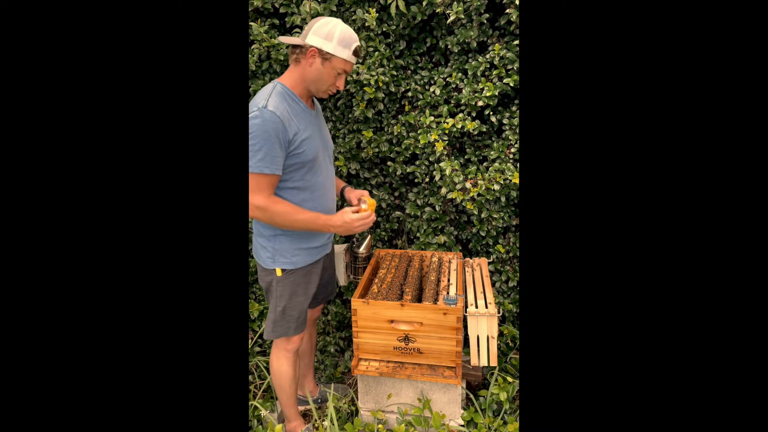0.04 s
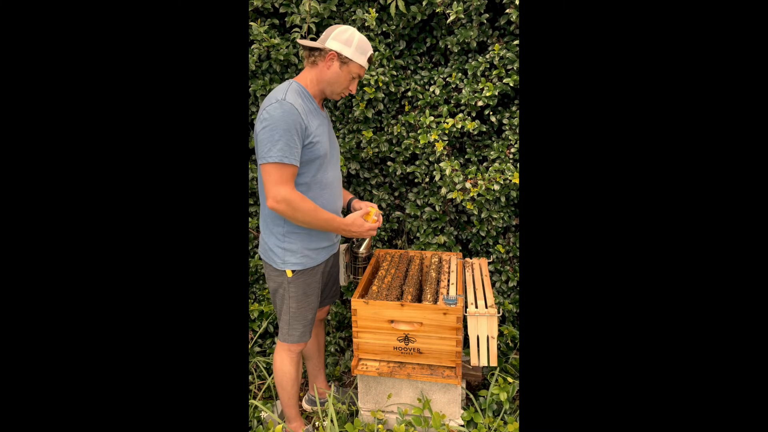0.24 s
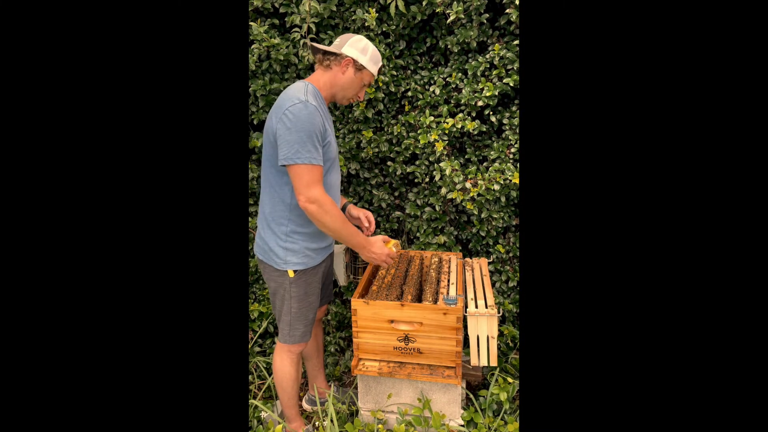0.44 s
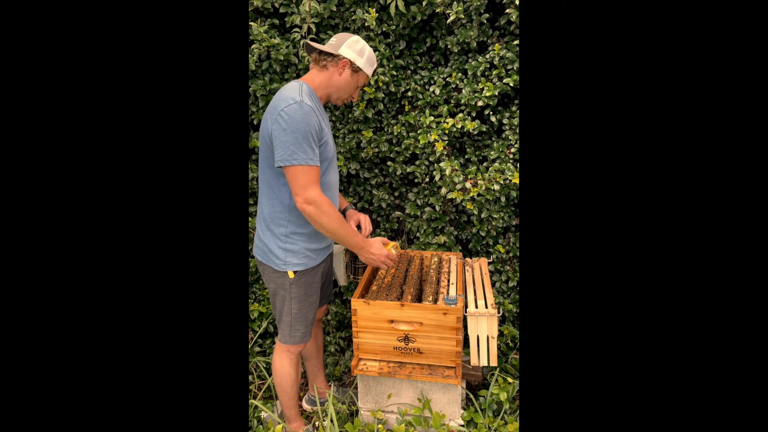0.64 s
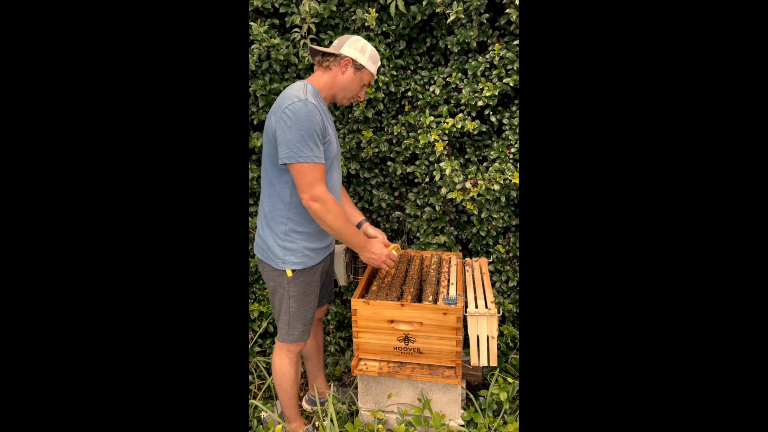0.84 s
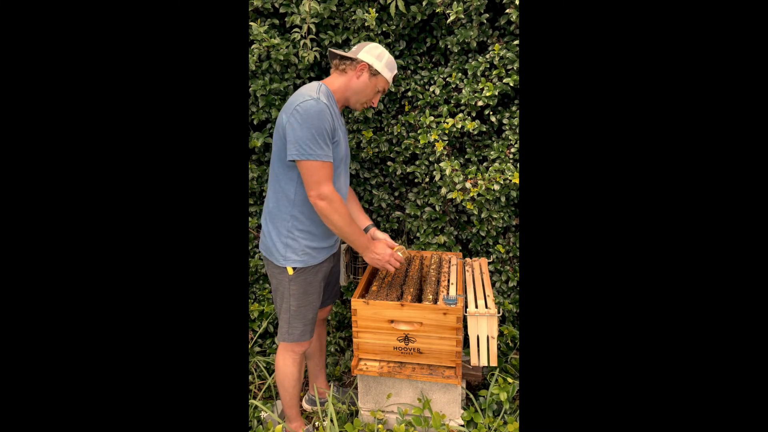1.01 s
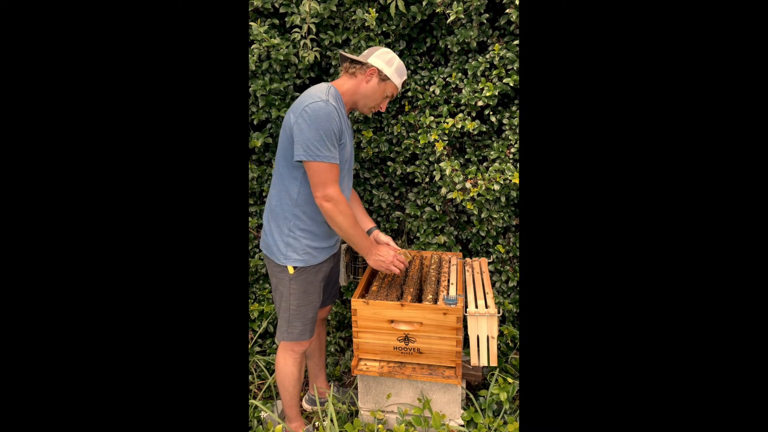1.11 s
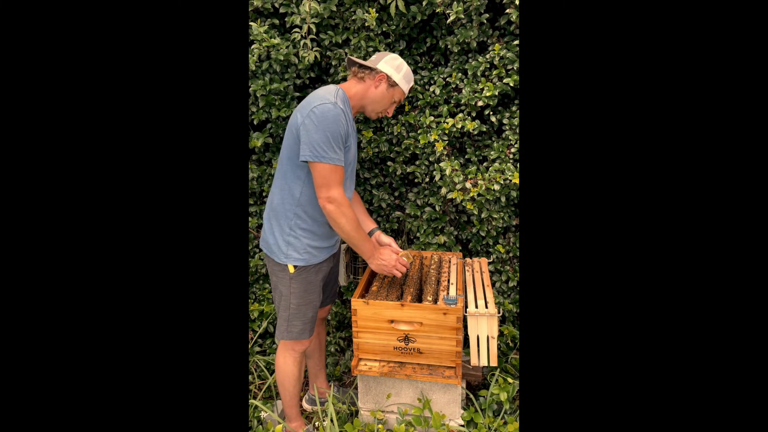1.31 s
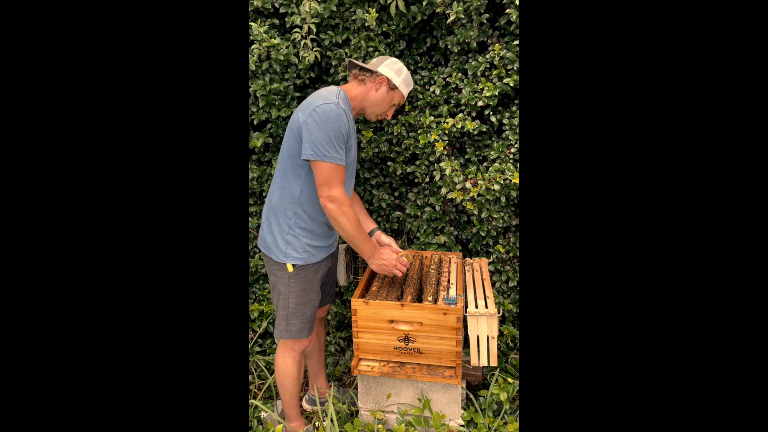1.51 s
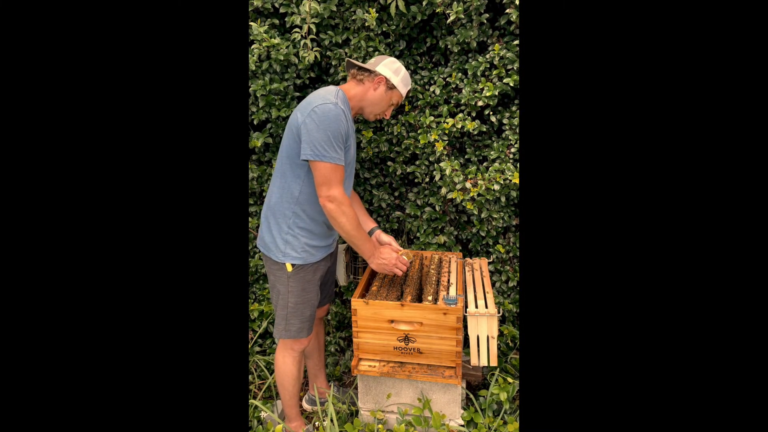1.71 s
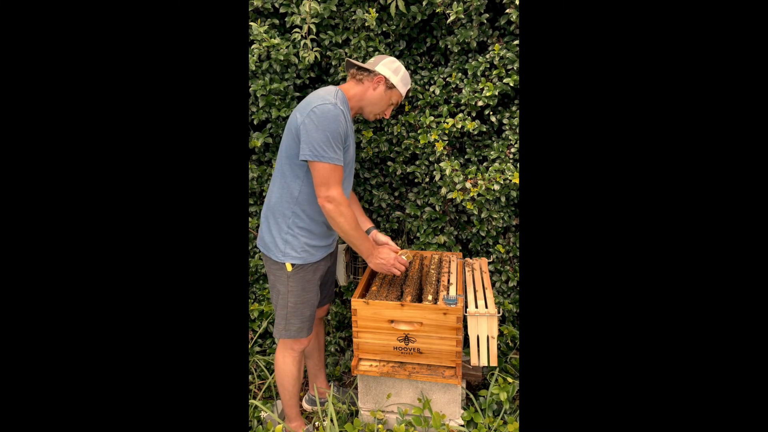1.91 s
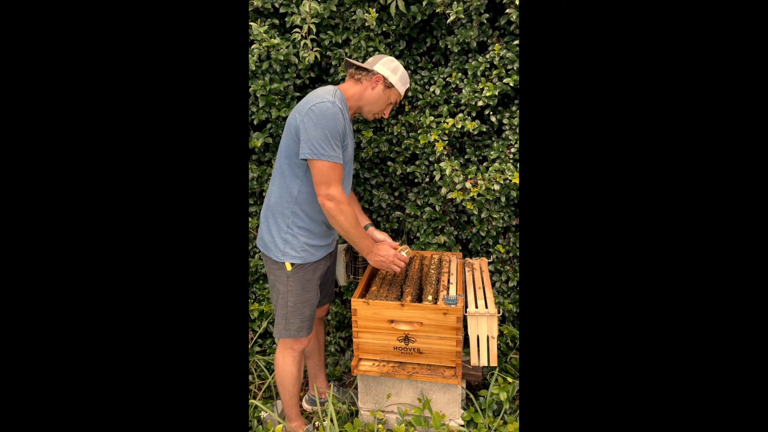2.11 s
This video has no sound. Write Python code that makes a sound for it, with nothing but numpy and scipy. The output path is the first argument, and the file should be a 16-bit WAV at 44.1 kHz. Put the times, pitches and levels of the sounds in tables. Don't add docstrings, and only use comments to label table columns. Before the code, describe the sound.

Honeybees buzz around an open wooden hive outdoors, with soft dull knocks on the wood

```python
import sys
import numpy as np
from scipy import signal
from scipy.fft import rfft, irfft
from scipy.io import wavfile
from scipy.ndimage import uniform_filter1d

SR = 44100
rng = np.random.default_rng(int(sys.argv[2]) if len(sys.argv) > 2 else 0)


def amplitude_ratio(level_db):
    exponent = np.asarray(level_db, float) / 20
    return 10 ** exponent


def materialize(psi):
    bounded = np.clip(np.atleast_2d(psi).T, -1, 1)
    quanta = np.round(bounded * 32767).astype(np.int16)
    wavfile.write(sys.argv[1], SR, quanta)


N = 94815
T = np.arange(N) / SR
HZ = np.maximum(np.arange(N // 2 + 1) * SR / N, 1)
GATE_S = 0.17
OPPOSITE = np.array([[1], [-1]])


def unit(x):
    return x / np.sqrt(np.mean(x ** 2))


def noise():
    return rng.standard_normal(N)


def curve(rows, axis=1):
    rows = np.array(rows)
    return np.interp(T, rows[:, 0], rows[:, axis])


def along(points):
    p = np.array(points)
    return np.interp(np.log(HZ), np.log(p[:, 0]), p[:, 1])


def gain_db(x, points):
    octaves_below = np.maximum(np.log2(points[0][0] / HZ), 0)
    octaves_above = np.maximum(np.log2(HZ / points[-1][0]), 0)
    return irfft(rfft(x) * amplitude_ratio(along(points) - 90 * (octaves_below + octaves_above)), N)


def walk(rate):
    k = int(SR / rate)
    held = np.repeat(rng.standard_normal(N // k + 1), k)
    return 1.463 * uniform_filter1d(uniform_filter1d(held, k), k)[:N]


def flicker(x, points, own_db, rate, lowest=21, count=12):
    spectrum = rfft(gain_db(x, points))
    total = 0
    for centre in lowest + np.arange(count):
        band = np.clip(1 - abs(3 * np.log2(HZ) - centre), 0, 1)
        total = total + amplitude_ratio(own_db * walk(rate)) * irfft(spectrum * band, N)
    return unit(total)


def wings(hz, orders, waver_db):
    phase = 2 * np.pi * np.cumsum(hz) / SR
    total = 0
    for k, db in orders:
        total = total + amplitude_ratio(db + waver_db * walk(13.7)) * np.sin(k * phase + 6 * rng.random())
    return np.sqrt(2) * total


def rings(modes, start, rise):
    t = np.maximum(T - start, 0)
    ringing = sum(amplitude_ratio(db - 60 * t / t60) * np.sin(2 * np.pi * hz * t) for hz, db, t60 in modes)
    return (1 - np.exp(-(t / rise) ** 2)) * ringing


# low end, top end, top-end port difference
# freq_hz, level_db (per Hz)
LEAK_LOW = [(45, -11), (80, 4), (150, -0.5), (220, -20), (380, -37), (590, 0.5), (900, -15.5), (1500, -29)]
LEAK_TOP = [(1800, 3.5), (3700, -4), (5600, 1), (7900, 1), (8600, -61), (9900, -7), (10900, 9.5),
            (11700, -36)]
LEAK_SIDE = [(1800, -14), (3700, -7), (5100, 3), (6000, -22), (7200, -2), (9200, 3), (10900, 5),
             (11700, -28)]


def gate_leak():
    low_db, sag_db_per_s, top_db, side_db = -65.5, -55, -79, -78.5
    mid, apart = unit(gain_db(rng.standard_normal((2, N)), LEAK_LOW)) * amplitude_ratio(2.0 * walk(25))
    low = mid + gain_db(apart, [(250, 15), (600, -0.5), (1600, -6)]) * OPPOSITE
    top = unit(gain_db(noise(), LEAK_TOP)) * amplitude_ratio(top_db)
    top = top + unit(gain_db(noise(), LEAK_SIDE)) * amplitude_ratio(side_db) * OPPOSITE
    top = top * amplitude_ratio(1.9 * walk(26.3))
    return (low * amplitude_ratio(low_db + sag_db_per_s * T) + top) * amplitude_ratio(-600 * np.maximum(T - GATE_S, 0))


def dying_thrum():
    return unit(gain_db(noise(), [(230, -1), (700, -4.0)])) * amplitude_ratio(-63 - 200 * T)


def rumble():
    ports = np.array([[1, 0.25], [1, -0.22]]) @ rng.standard_normal((2, N))
    return unit(gain_db(ports, [(35, 0), (60, -17.0), (85, -3)])) * amplitude_ratio(-87 - 5.5 * T)


def far_murmur():
    level_db, full_s, rise_s = -78, 0.52, 0.22
    rise_db = level_db - 12 * np.clip((full_s - T) / rise_s, 0, 1) - 1.74 * T
    return unit(gain_db(noise(), [(850, 8.5), (1400, -2.5)])) * amplitude_ratio(1.9 * walk(14.8)) * amplitude_ratio(rise_db)


# start_s, level_db, ring_set (index)
TICKS = [
    (.0700, -46, 0),
    (.1333, -41, 1),
]
# freq_hz, level_db, t60_s
TICK_RINGS = [
    [(7540, 0, 0.012), (10400, -3, 0.0087), (3480, -7, 0.0067), (9000, -12, .01)],
    [(10580, 1.5, 0.011), (5530, 1, 0.0065), (3850, -3, 0.0054), (11900, -12, 0.013), (7460, -5, 0.0053)],
]


def ticks():
    tail_db, tail_t60_s = -16, 0.045
    right_lag_s = 2.8e-5
    out = 0
    for s, db, k in TICKS:
        modes = TICK_RINGS[int(k)]
        tail = [(hz, d + tail_db, tail_t60_s) for hz, d, _ in modes]
        grit = uniform_filter1d(uniform_filter1d(rng.standard_normal((2, N)), size=40), size=30) * 7
        hit = rings(modes, s + np.array([[0], [right_lag_s]]), .0011)
        out = out + amplitude_ratio(db + 1.0 * OPPOSITE) * (hit + grit * rings(tail, s, .004))
    return gain_db(out, [(2000, 0), (12600, 0)])


def flecked(x):
    fleck_db = 2.9
    z = signal.stft(x, nperseg=512)[2]
    patch = uniform_filter1d(rng.standard_normal(z.shape[1:]), size=2, axis=0)
    patch = uniform_filter1d(patch, size=3, axis=1)
    return unit(signal.istft(z * amplitude_ratio(fleck_db * unit(patch)), nperseg=512)[1][:, :N])


# freq_hz, level_db
PORT_SIDE = [(1250, -9), (1800, -8), (2700, -1), (4500, -1.5), (5600, -6), (6600, -12.5), (8300, -8),
             (9400, -1.5)]
# freq_hz, share (0 to 1, negative leans right)
PORT_LEAN = [(2000, 0.0079), (2450, 0.57), (4800, 0.6), (6200, 0.43), (11000, -0.17), (12200, -0.055),
             (13500, 0.36), (15200, -0.13)]


def wide(points, own_db, lowest, count):
    both, other = rng.standard_normal((2, N)) * amplitude_ratio(.5 * walk(60))
    lean = np.clip(along(PORT_LEAN), -1, 1)
    mixed = lean * rfft(both) + np.sqrt(1 - lean ** 2) * rfft(other)
    side = irfft(amplitude_ratio(along(PORT_SIDE)) * mixed, N)
    return flecked(flicker(np.array([both + side, both - side]), points, own_db, 20, lowest, count))


# start_s, level_db
RUSTLE = [(0.17, -84), (0.192, -86), (0.214, -63), (0.23, -58), (0.262, -60), (0.616, -58.5), (0.88, -61),
          (1.294, -60.5), (1.3, -62.5), (1.476, -61), (1.51, -57), (1.63, -62), (1.658, -59),
          (1.692, -63.5), (1.978, -67), (1.994, -68), (2.104, -67), (2.15, -69)]
# freq_hz, level_db (per Hz)
RUSTLE_COLOUR = [(1300, -18.5), (1900, -4), (2350, -3.5), (2600, -11), (3900, 1), (4450, -5.5), (5200, -4),
                 (6200, -15)]
# order (multiple of its pitch), level_db
WHINE_ORDERS = [(9, -6.5), (10, -2.5), (12, -30), (13, -16.5), (14, -18.5), (15, -1), (16, -2), (17, -25),
                (18, -3), (21, -15), (30, -20)]


def rustle():
    whine_hz, whine_db = 235.05, -17.5
    lone_hz, lone_db = 2396.5, -7
    whine = wings(np.full(N, whine_hz), WHINE_ORDERS + [(lone_hz / whine_hz, lone_db)], 2.0)
    mids = wide(RUSTLE_COLOUR, own_db=1.1, lowest=29, count=11) + whine * amplitude_ratio(whine_db + 3.0 * OPPOSITE)
    rush_db = 0.26 * np.exp(-np.maximum(T - .22, 0) / 0.037)
    return amplitude_ratio(curve(RUSTLE) + 2.0 + rush_db) * mids


# start_s, level_db
AIR = [(0.17, -86), (0.196, -107), (0.224, -74), (0.434, -70), (0.444, -72.5), (0.572, -68), (0.748, -75.5),
       (1.366, -75.5), (1.398, -70.5), (1.444, -76), (1.488, -71), (1.696, -74.5), (1.752, -79),
       (2.15, -83.5)]
# freq_hz, level_db (per Hz)
AIR_COLOUR = [(6200, 0.5), (6850, 6.5), (7700, 0.5), (9900, -5.5), (10800, -4.5), (12500, -7.5),
              (15000, -3.5), (15600, -6)]


def air():
    gate_db = -25 * (T < GATE_S + .01)
    return amplitude_ratio(curve(AIR) + 2.0 + gate_db) * wide(AIR_COLOUR, own_db=1.3, lowest=37, count=6)


# order (multiple of wing beat), level_db
PASS_ORDERS = [(1, 3.5), (1.5, -0.5), (2, -3), (2.5, -7), (3, -22)]


def passes():
    bees, length_s = 110, .18
    pitch_hz, spread_hz, glide = 264.4, 45, 0.099
    out, n = np.zeros(N), int(length_s * SR)
    u = np.arange(n) / n
    for j, (at, pitch, slide, size) in enumerate(rng.random((bees, 4))):
        hz = (pitch_hz + spread_hz * (2 * pitch - 1)) * (1 + glide * (2 * slide - 1) * (u - .5))
        i = int((j + at) / bees * (N - n))
        phase = 2 * np.pi * np.cumsum(hz) / SR
        buzz = sum(amplitude_ratio(db) * np.sin(k * phase) for k, db in PASS_ORDERS)
        out[i:i + n] += amplitude_ratio(-10 * size) * np.sin(np.pi * u) ** 2 * buzz
    return unit(out)


# start_s, level_db
SWARM = [(0.17, -78), (0.252, -49), (0.39, -52.5), (0.422, -52), (0.692, -50), (0.712, -55), (0.74, -53.5),
         (0.924, -50), (1.06, -50.5), (1.12, -57), (1.2, -50), (1.382, -53), (1.41, -49), (1.448, -56),
         (1.47, -48), (1.536, -53), (1.55, -54), (1.724, -57.5), (1.84, -53.5), (1.856, -56), (1.92, -53),
         (1.956, -64), (2.07, -61), (2.15, -61)]
# freq_hz, level_db (per Hz)
SWARM_COLOUR = [(185, -18.5), (250, 0.5), (330, 0.5), (480, -3), (700, -10.5), (800, -14.5), (900, -27.5),
                (1100, -44.5)]
DEEP_COLOUR = [(55, -34), (95, -24.5), (125, -11), (165, 1.5), (235, 0)]
# order (multiple of wing beat), level_db
LOW_ORDERS = [(1, -5), (1.5, -10), (2, -5), (2.5, -8.5), (3, -17)]


def swarm():
    puffs_per_s, puff_spread_db = 1800, 1.3
    low_hz, low_db = 227.3, -6
    deep_db, deep_fades_s, deep_sag_db_per_s = -10, 0.98, -14
    puffs = (rng.random(N) < puffs_per_s / SR) * noise() * amplitude_ratio(puff_spread_db * rng.exponential(size=N))
    gust = amplitude_ratio(.9 * walk(40))
    thrum = flicker(puffs, SWARM_COLOUR, 1.4, 20) * gust
    deep_level_db = deep_db + deep_sag_db_per_s * np.maximum(T - deep_fades_s, 0)
    deep = unit(gain_db(puffs, DEEP_COLOUR)) * gust * amplitude_ratio(deep_level_db)
    low_bee = wings(low_hz * (1 + .012 * walk(12)), LOW_ORDERS, 3.0) * amplitude_ratio(low_db - 3.0 * T)
    fly_bys = amplitude_ratio(-4 - 8.0 * np.clip(T - 1.3, 0, 1)) * passes()
    stray = unit(gain_db(noise(), [(380, 0), (800, -2)])) * amplitude_ratio(-39.0 + 12.3 * walk(40.7))
    return amplitude_ratio(curve(SWARM)) * (thrum + deep + low_bee + fly_bys + stray * OPPOSITE)


# start_s, pitch_hz (wing beat), level_db
NEAR = [(0.2, 265.5, -59.5), (0.258, 261.2, -37.5), (0.404, 258.8, -36.5), (0.424, 257.9, -43.5),
        (0.55, 263.9, -36.5), (0.726, 258.2, -44.5), (0.75, 260.5, -39.5), (0.976, 260.5, -40.5),
        (0.988, 256.3, -55.5), (1.038, 256.5, -43.5), (1.118, 255.8, -56), (1.202, 255.1, -46.5),
        (1.386, 259.2, -64.5), (1.402, 260.2, -54), (1.444, 261, -71), (1.47, 261.4, -47),
        (1.594, 257.7, -56.5), (1.7, 269.8, -67)]
# order (multiple of wing beat), level_db
NEAR_ORDERS = [(.5, -33), (1, -1), (1.5, -24), (2, -31), (3, -31)]
# centre_s, change_db, length_s
TURNS = [(0.277, -10.5, 0.0049), (0.42, -1, 0.0069), (.712, -13, 0.024), (0.775, -8, 0.0046),
         (0.874, 0, 0.0043), (0.924, -6.5, 0.0085), (1.067, -8, 0.0069), (1.185, -8, 0.0057),
         (1.275, 10, 0.008), (1.494, -6, .008), (1.563, -10, 0.0091), (1.643, -9, 0.0077)]


def near_bee():
    takeoff_db, takeoff_s = -18, 0.029
    turns_db = sum(db * np.exp(-((T - s) / length) ** 2) for s, db, length in TURNS)
    tremble = 0.0037 + 0.011 * np.clip(T - 1, 0, .4)
    hz = curve(NEAR) * (1 + tremble * walk(25.2))
    forced = wings(hz, [(3.05, takeoff_db)], 1.1) * np.exp(-((T - .24) / takeoff_s) ** 2)
    edges_db = -400 * np.maximum(T - NEAR[-1][0], 0) - 1500 * np.maximum(NEAR[0][0] - T, 0)
    return amplitude_ratio(curve(NEAR, axis=2) + turns_db + edges_db) * (wings(hz, NEAR_ORDERS, 0.84) + forced)


# peak_s, level_db, pitch_hz
KNOCKS = [(1.046, -36, 291), (1.092, -43, 352), (1.101, -35, 341), (1.11, -38, 360), (1.14, -39, 392),
          (1.145, -53, 367), (1.164, -33, 286), (1.203, -39, 300), (1.241, -34, 346), (1.261, -40, 347),
          (1.303, -35.5, 345), (1.311, -40, 375), (1.336, -53, 353), (1.404, -50.5, 331), (1.417, -45, 363),
          (1.467, -37.5, 365), (1.523, -41.5, 329), (1.531, -37.5, 330), (1.568, -45.8, 354),
          (1.612, -54, 348), (1.621, -42, 333), (1.667, -47.5, 352), (1.699, -59, 401), (1.733, -57, 466),
          (1.77, -55, 425), (1.778, -49, 498), (1.798, -43.9, 384), (1.827, -42, 386), (1.833, -40.5, 410),
          (1.868, -44, 424), (1.874, -39, 489), (1.9, -42, 456), (1.912, -52, 434), (1.917, -46.3, 438),
          (1.931, -53, 449), (1.998, -53, 370), (2.044, -43, 368), (2.055, -57, 327), (2.06, -67, 392),
          (2.101, -51, 406), (2.129, -46, 425), (2.147, -47, 479)]


def knocks():
    trim_db, rise_s, fall_s = -2.5, 0.0022, 0.002
    out = 0
    for s, db, hz in KNOCKS:
        t = T - s
        bump = np.exp(-(t / np.where(t < 0, rise_s, fall_s)) ** 2)
        out = out + amplitude_ratio(db + trim_db) * bump * np.cos(2 * np.pi * hz * t)
    return gain_db(out, [(190, 0), (850, 0)])


def scene():
    behind_gate = gate_leak() + dying_thrum() + rumble() + far_murmur()
    hiss = rustle() + air()
    return behind_gate + ticks() + hiss + swarm() + near_bee() + knocks()


def band_limit(x):
    return signal.sosfilt(signal.butter(12, 15700, fs=SR, output="sos"), x)


def record(dry):
    return band_limit(dry)


dry = scene()
out = record(dry)
materialize(out)
```